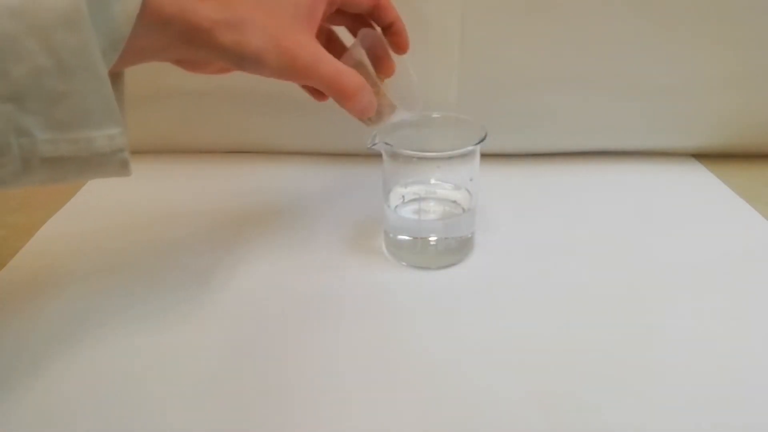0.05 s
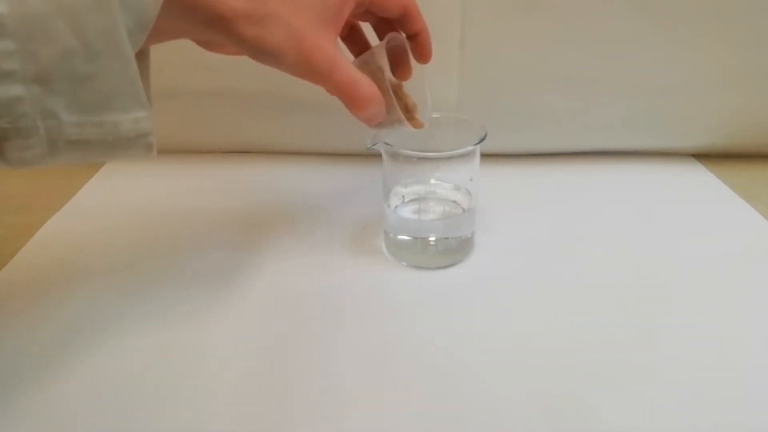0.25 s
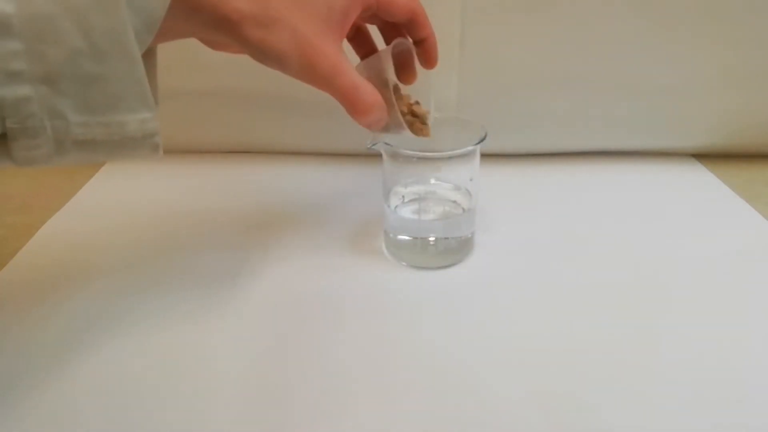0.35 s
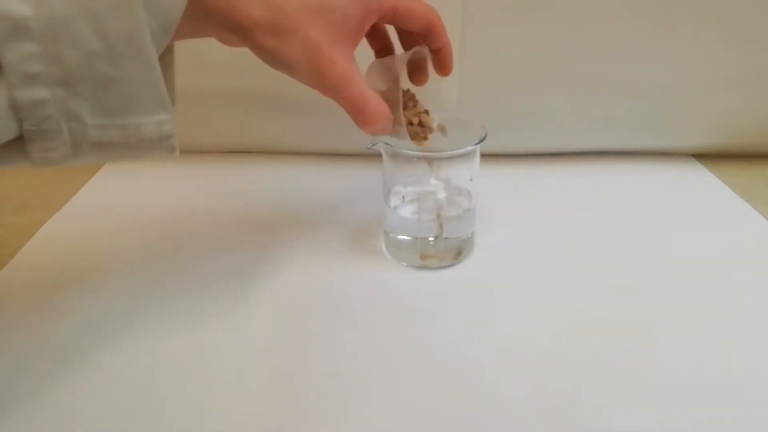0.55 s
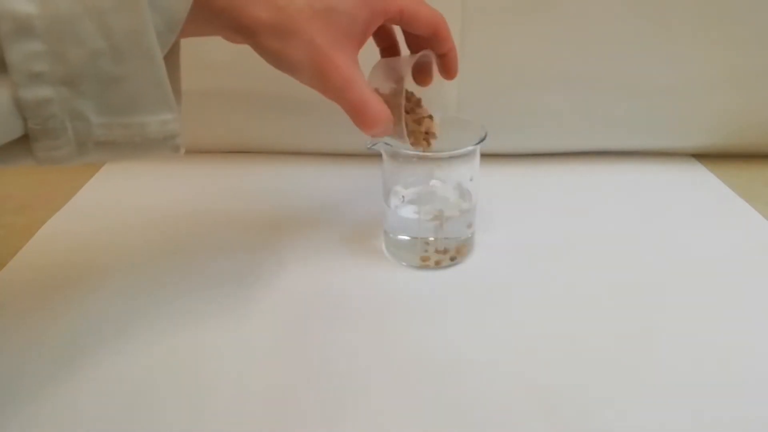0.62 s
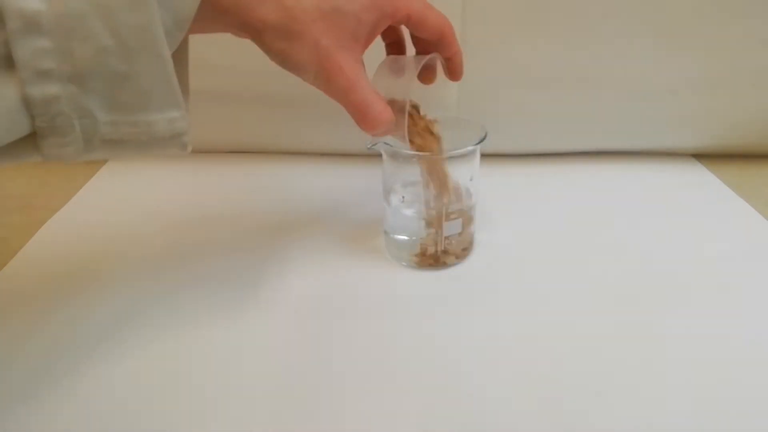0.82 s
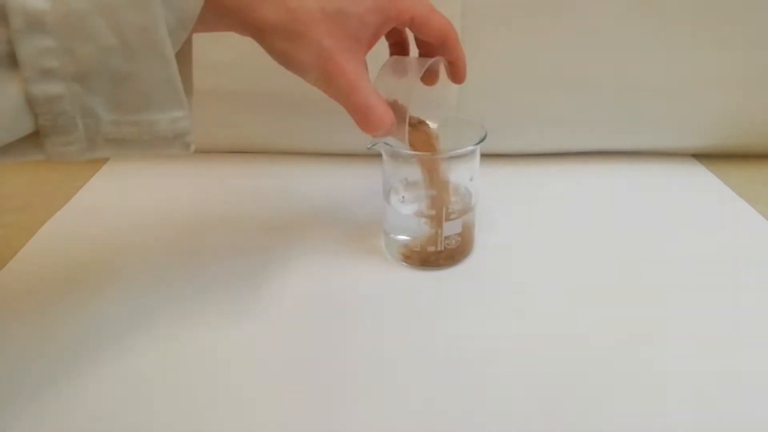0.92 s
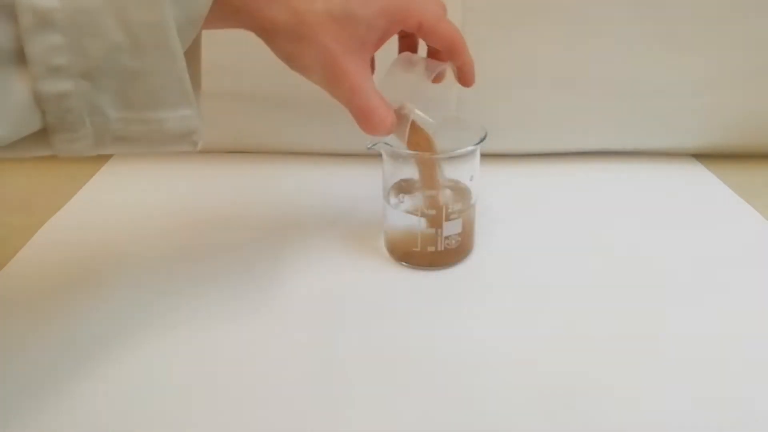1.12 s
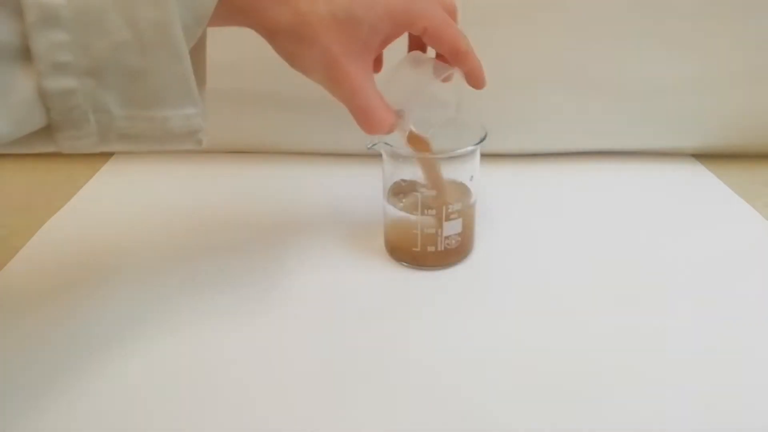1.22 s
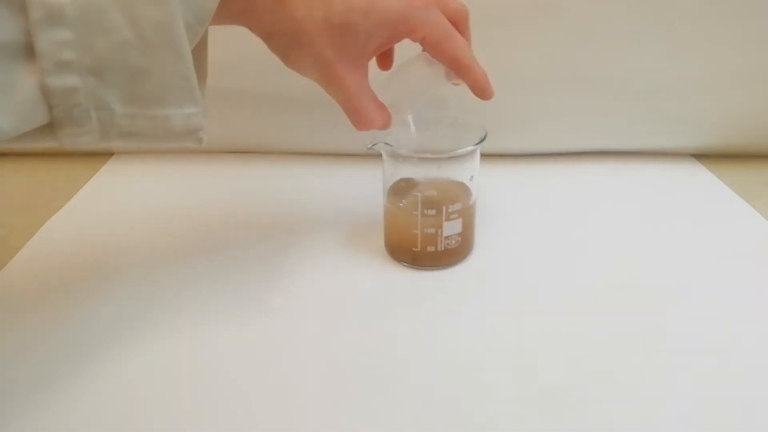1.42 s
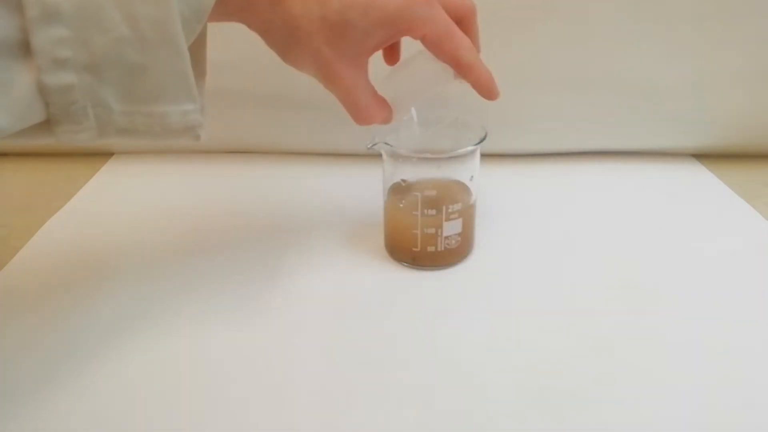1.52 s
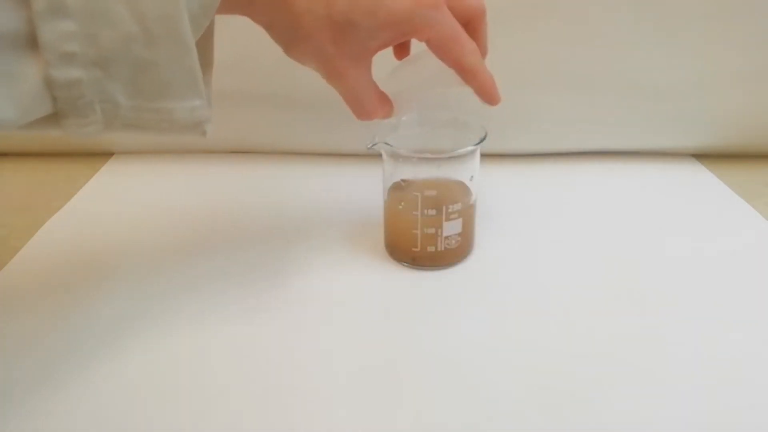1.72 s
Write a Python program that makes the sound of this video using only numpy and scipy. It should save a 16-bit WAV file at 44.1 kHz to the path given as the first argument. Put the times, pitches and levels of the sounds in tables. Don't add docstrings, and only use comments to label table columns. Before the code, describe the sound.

Coarse grains tick and rattle sharply in a small plastic dish, then slide with fine sand into a glass beaker of water, hissing, ringing the glass and plinking. Quiet humming room, close bright recorder, duller on the left.

```python
import sys
import numpy as np
from scipy import signal
from scipy.fft import rfft, irfft
from scipy.io import wavfile

SR = 44100
rng = np.random.default_rng(int(sys.argv[2]) if len(sys.argv) > 2 else 0)


def how_loud(loudness_db):
    steps = np.asarray(loudness_db, float) / 20
    return 10 ** steps


def unload_audio(sound):
    columns = np.transpose(np.atleast_2d(sound))
    steps = np.round(np.clip(columns, -1, 1) * 32767)
    wavfile.write(sys.argv[1], SR, steps.astype(np.int16))


N = 77175
TIME = np.arange(N) / SR
HZ = np.fft.rfftfreq(N, 1 / SR)
TICK_T60_S, TICK_LOW_HZ = 0.0075, 6030
TICK_DB, TICK_LATE_S = 3, 0.0006


def evened(x):
    return x / np.sqrt(np.mean(x ** 2) + 1e-20)


def read(points, hz):
    f, value = np.transpose(points)
    return np.interp(np.log(hz + 1), np.log(f + 1), value)


def add(mix, s, sound):
    part = mix[round(s * SR):][:len(sound)]
    part += sound[:len(part)]


def wander(per_s):
    knots = rng.standard_normal(round(N / SR * per_s) + 2)
    return np.interp(TIME * per_s, np.arange(len(knots)), knots)


def resonate(x, hz, width):
    turn = np.exp(2j * np.pi * hz * TIME)
    r = np.exp(-np.pi * width / SR)
    return 2 * (turn * signal.lfilter([1 - r], [1, -r], x / turn)).real


def high_pass(x, hz):
    return signal.lfilter(*signal.butter(2, hz, "high", fs=SR), x)


def room_air():
    # (frequency [Hz], level [dB])
    air_left = [(25, -2.5), (200, -6), (400, -13), (1400, -20.5), (4500, -30), (7300, -34), (10000, -28),
                (15500, -27)]
    air_right = [(25, -6.5), (200, -4.5), (400, -16.5), (1400, -24.5), (4500, -29.5), (9500, -50),
                 (13000, -15), (15500, -17)]
    # (frequency [Hz], likeness [0..1])
    likeness = [(60, 0.84), (270, 0.65), (640, 0.41), (1400, 0), (6800, 0.25), (10000, 0.12)]
    # (frequency [Hz], width [Hz], level [dB])
    hum = [(198.7, 8.9, -70.5), (101.2, 9.5, -79), (48.4, 37, -83)]
    # (time [s], level [dB], frequency [Hz], length [s])
    thumps = [
        (0.039, -58.5, 87, 0.061),
        (.04, -57.5, 264, 0.019),
        (0.731, -54.5, 680, 0.0069),
        (0.948, -57, 82, 0.23),
    ]

    a, b, c = rng.standard_normal((3, N))
    same = np.clip(read(likeness, HZ), 0, 1)
    spectra = np.array([rfft(a), same * rfft(a) + np.sqrt(1 - same ** 2) * rfft(b)])
    colour = how_loud(np.array([read(air_left, HZ), read(air_right, HZ)]))
    air = how_loud(-62) * evened(irfft(spectra * colour, N))
    low = sum(how_loud(db) * evened(resonate(c, hz, width)) for hz, width, db in hum)
    for s, db, hz, length in thumps:
        t = np.arange(0, length, 1 / SR)
        add(low, s, how_loud(db) * np.sin(np.pi * t / length) * np.sin(2 * np.pi * hz * t))
    return air + low


def knocks():
    # (time [s], peak [dB], decay t60 [s])
    blows = [(0.0394, -33.5, 0.031), (0.2094, -48.5, 0.045), (.222, -39, 0.045), (.3, -49, 0.067),
             (0.331, -50, 0.062), (0.355, -48, 0.042), (0.381, -49.5, 0.14), (0.448, -47, 0.041),
             (.478, -44, 0.022), (.731, -42.5, 0.021), (1.114, -46, 0.073)]
    # (frequency [Hz], level [dB])
    modes = [(1165, 2.5), (1420, -9), (1750, -0.5), (1960, -1), (2250, -22)]

    out, t = np.zeros(N), TIME[:5000]
    band = signal.butter(3, [800, 2200], "band", fs=SR, output="sos")
    for s, db, t60 in blows:
        decay = how_loud(-60 * t / t60)
        ring = 0
        for hz, mode_db in modes:
            odd = rng.standard_normal()
            ring = ring + how_loud(mode_db + 2 * odd) * decay * np.sin(2 * np.pi * hz * (1 + 0.02 * odd) * t)
        puff = signal.sosfilt(band, rng.standard_normal(len(t))) * decay
        add(out, s, how_loud(db - 0.5) * (ring / abs(ring).max() + 0.8 * puff / abs(puff).max()))
    return out


def plinks():
    # (time [s], peak [dB], pitch [Hz], decay t60 [s])
    bubbles = [(.275, -41.5, 1953, 0.037), (.558, -40, 14000, 0.044), (.57, -40, 15250, 0.064),
               (.574, -47, 1685, 0.027), (0.6, -36, 13100, .05), (.603, -36, 13500, .07),
               (.604, -49, 10100, .04), (.628, -42, 14000, .05), (0.68, -32.5, 10000, .04),
               (0.608, -46.5, 1360, 0.078), (0.77, -46.5, 1790, 0.031), (.81, -66.5, 467, 0.67),
               (0.8113, -38.5, 5900, 0.1), (0.813, -43.5, 3280, 0.048), (.812, -49, 1489, 0.077),
               (0.837, -48.5, 3240, 0.071), (.826, -49.5, 1355, 0.049), (0.846, -50.5, 1220, 0.037),
               (.866, -43, 1658, 0.049), (0.8673, -37.5, 5530, 0.079), (0.869, -49, 1160, 0.048),
               (0.89, -43.5, 1187, 0.13), (.962, -46.5, 3410, 0.052), (.965, -39, 5180, 0.069),
               (1.037, -51.5, 1950, 0.07), (1.051, -40, 3410, 0.018), (1.0509, -34.5, 3830, 0.042),
               (1.334, -52.5, 5330, .05)]

    out, t = np.zeros(N), TIME[:6000]
    for s, db, hz, t60 in bubbles:
        envelope = how_loud(db - 60 * t / t60) * np.minimum(t / 0.00046, 1)
        add(out, s, envelope * np.sin(2 * np.pi * hz * t))
    return out * (1 + 0.25 * wander(250))


def snaps():
    # (time [s], peak [dB], colour [Hz])
    strays = [(0.0404, -41, 9000), (0.088, -45, 14500), (.1651, -50, 13000), (0.2721, -22.5, 8900),
              (0.275, -29, 9500), (0.3182, -25, 12100), (0.3277, -40, 12500), (.3476, -44, 13000),
              (.3569, -23, 13600), (.3927, -49, 13000), (.4126, -40, 13500), (0.421, -38, 12400),
              (.4259, -38, 8950), (.4433, -32, 13000), (.4475, -28, 12600), (.4626, -41, 12000),
              (0.4586, -41, 12100), (0.515, -46, 13000), (.6085, -45, 12500), (.6417, -34, 10900),
              (0.6906, -29, 12600), (0.725, -31, 11900), (0.7456, -43, 14100), (.761, -33, 12700),
              (.7756, -32.5, 10330), (.812, -31, 12700), (0.8408, -29, 12500), (0.8875, -27, 12100),
              (0.8924, -27, 10900), (0.9305, -30, 12600), (0.945, -28, 14500), (0.9493, -25.5, 12000),
              (1.0182, -29, 7400), (1.1, -28, 12960), (1.1598, -28.5, 13500), (1.1887, -31, 14000),
              (1.206, -36, 11900), (1.2167, -36, 12500), (1.22, -42, 9800), (1.2344, -37, 13000),
              (1.2405, -37, 10230), (1.2457, -33.5, 12500), (1.2606, -34, 13500), (1.307, -28.5, 14200),
              (1.3257, -32.5, 14000), (1.333, -36, 10300), (1.3584, -36, 14300), (1.381, -48, 12800),
              (1.4049, -47, 13600), (1.4125, -41.5, 11600), (1.4354, -49, 14500), (1.4739, -45.5, 11200),
              (1.563, -49, 8000), (1.572, -45, 14700), (1.5756, -58, 13500), (1.601, -52.5, 15000),
              (1.6034, -49, 6200), (1.6262, -52, 13800)]
    t60_s, spread = 0.0044, 1.36

    out, t = np.zeros(N), TIME[:500]
    envelope = how_loud(-60 * t / t60_s) * np.minimum(t / 0.0003, 1)
    for s, db, hz in strays:
        edges_hz = [hz / spread, min(hz * spread, SR / 2.2)]
        burst = np.tanh(2 * rng.standard_normal(500)) * envelope
        x = signal.lfilter(*signal.butter(2, edges_hz, "band", fs=SR), burst)
        add(out, s + TICK_LATE_S, how_loud(db + TICK_DB) * x / abs(x).max())
    return out


def tick(t60):
    t = TIME[:900]
    burst = np.tanh(2 * rng.standard_normal(900)) * how_loud(-60 * t / t60) * np.minimum(t / 0.00034, 1)
    x = high_pass(burst, TICK_LOW_HZ)
    return x / abs(x).max()


def patter(per_s, size_db, low_hz):
    hits = (rng.random(N) < per_s / SR) * how_loud(2 * size_db * np.minimum(rng.exponential(1, N), 3))
    count = 8
    kind, out, t = rng.integers(0, count, N), np.zeros(N), TIME[:600]
    for k in range(count):
        power = how_loud(-120 * t / (TICK_T60_S * (0.5 + k / count))) * np.minimum(t / 0.0004, 1)
        strength = np.sqrt(abs(signal.oaconvolve(hits * (kind == k), power)[:N]))
        out += high_pass(rng.standard_normal(N) * strength, low_hz * (0.59 + k % 4 / 4))
    return evened(out)


def glass(strikes):
    # (frequency [Hz], width [Hz], level [dB])
    wall = [(1190, 90, -9), (1700, 200, -12), (3250, 160, -6), (5070, 90, -8), (5590, 100, -5),
            (5950, 110, -4), (6650, 150, -7), (10100, 260, -1), (11800, 400, -4), (12900, 400, -3),
            (13900, 350, -2), (15200, 300, -2)]

    out = np.zeros(N)
    for hz, width, db in wall:
        out += how_loud(db) * resonate(strikes * how_loud(5.5 * wander(100)), hz, width)
    return 3 * out


def grains():
    # (time [s], fine sand [dB], coarse grains [dB])
    flow = [(0, -54.5, -80), (.12, -64.5, -77), (0.201, -49.5, -68), (.222, -39.5, -32.5), (.27, -35, -51),
            (0.343, -47.5, -71), (0.371, -38.5, -69), (.47, -44.5, -56), (.545, -52, -72),
            (0.601, -42, -68), (.67, -47, -71), (.7, -44.5, -42), (.8, -42, -59), (.9, -44.5, -40.5),
            (1.08, -51, -44.5), (1.251, -57.5, -53), (1.4, -69.5, -61.5), (1.75, -69.5, -89)]
    # (time [s], peak [dB], length share)
    dish_ticks = [(0.015, -37.5, 0.8), (0.0192, -37, 1.5), (.0732, -44.5, 1.3), (0.1355, -31.5, 0.54),
                  (.155, -34.5, .9), (.181, -20, 0.79), (0.1877, -28.5, 0.64), (.2000, -28, 0.76),
                  (0.2086, -3, 0.86), (0.221, -20, 1.6), (0.2292, -19.5, 1.4), (0.2428, -19.5, 1.1),
                  (0.2471, -16, 1.25), (.2594, -46, 1.3), (.267, -29, 2), (.2820, -19.5, 0.4),
                  (0.3021, -20.5, 0.69), (0.3102, -20, 1.1), (0.3317, -21, .8), (0.3533, -16.5, 0.97),
                  (0.3866, -33, 0.42), (0.454, -24, 0.73), (0.478, -27, 0.47), (0.4914, -27.5, 0.48),
                  (0.503, -27, 0.94), (0.525, -27.5, 0.92)]
    # (time [s], peak [dB], share that rings the glass)
    falling = [(.557, -38, 1), (.570, -34, 0.37), (.594, -30, .2), (0.6003, -33, 0.82), (.627, -38, 0.54),
               (.652, -33, .3), (0.661, -35, .6), (0.6799, -28.5, 0.8), (0.6946, -24.5, .2),
               (.705, -27.5, 0.36), (0.8194, -25.5, 0.52), (.867, -34, 0.62), (0.876, -28.5, 0.42),
               (1.1168, -28.5, 0.13), (1.1556, -35, 0.16), (1.175, -36.5, .2)]
    glass_from_s, glass_until_s, glass_db, ping_db = 0.627, 1.34, -7, 3.5

    s, fine_db, coarse_db = np.transpose(flow)
    dry = how_loud(np.interp(TIME, s, fine_db)) * patter(per_s=5000, size_db=4.5, low_hz=2420)
    dry += how_loud(np.interp(TIME, s, coarse_db)) * patter(per_s=600, size_db=0.5, low_hz=TICK_LOW_HZ)
    fade_db = -60 * np.maximum(TIME - glass_until_s, 0)
    strikes = dry * np.clip((TIME - glass_from_s) / 0.039, 0, 1) * how_loud(glass_db + fade_db)
    for s, db, length in dish_ticks:
        add(dry, s + TICK_LATE_S, how_loud(db + TICK_DB) * tick(TICK_T60_S * length))
    for s, db, share in falling:
        hit = how_loud(db + TICK_DB) * tick(TICK_T60_S * (1 + 2 * share))
        add(dry, s + TICK_LATE_S, (1 - share / 2) * hit)
        add(strikes, s + TICK_LATE_S, share * how_loud(ping_db) * hit)
    return dry + glass(strikes)


def tail(t60):
    t = TIME[:SR]
    x = rng.standard_normal(SR) * how_loud(-60 * t / t60) * np.minimum(t / 0.0011, 1)
    return x / np.linalg.norm(x)


def ports(x, left_db, right_db, direct_share):
    # (frequency [Hz], phase [rad])
    left_phase = [(300, -.6), (1200, -1.25), (3800, -2.2), (4600, -2.8), (5900, -5.9), (7500, -6.6),
                  (15500, -13)]
    # (frequency [Hz], half width [Hz], level [dB])
    valleys = [(2400, 250, -3), (2750, 150, -7), (4200, 350, -6)]
    near_t60_s, near_db, room_t60_s, room_db = 0.023, -13.5, 0.22, -8.5
    flat = np.ones(len(HZ))

    share = direct_share / (1 + (HZ / 7760) ** 6)
    lag = np.exp(1j * read(left_phase, HZ))
    near, far = np.zeros((2, 2, N))
    for k in range(10):
        part = x * abs(np.cos(np.pi * (TIME * 6 + k / 10))) ** 8 / np.sqrt(2)
        for port in range(2):
            near[port] += signal.fftconvolve(part, tail(near_t60_s))[:N]
            far[port] += signal.fftconvolve(part, tail(room_t60_s))[:N]
    direct = rfft(x) * np.array([share * lag, flat])
    nearby = rfft(near) * np.array([np.sqrt(1 - share ** 2), how_loud(near_db) * flat])
    heard = direct + nearby + how_loud(room_db) * rfft(far)
    dips_db = sum(db * np.exp(-((HZ - hz) / width) ** 2) for hz, width, db in valleys)
    return irfft(heard * how_loud(np.array([left_db, right_db]) + dips_db), N)


def scene():
    # (frequency [Hz], level [dB])
    left_colour = [(300, 8.5), (1400, -13), (4100, -11.5), (6200, -10.5), (7600, -4.5), (8400, -9.5),
                   (10000, -19.5), (15500, -36)]
    right_colour = [(300, 1.5), (1400, -7.5), (2800, -10.5), (4500, -9), (6200, -7), (8500, -7),
                    (10200, -5.5), (15500, -5.5)]

    left_db, right_db = read(left_colour, HZ), read(right_colour, HZ)
    tone_left_db = np.clip(left_db - right_db, -25, 0) - 1
    tones = ports(plinks() + knocks(), tone_left_db, np.full(len(HZ), 3), direct_share=0.92)
    pour = ports(how_loud(7.5) * (grains() + snaps()), left_db, right_db, direct_share=0.53)
    return pour + tones + room_air()


def band_limit(x):
    return signal.sosfilt(signal.butter(12, 17060, fs=SR, output="sos"), x)


def record(dry):
    x = signal.oaconvolve(dry, signal.firwin(511, 15850, fs=SR)[None], "same")
    return band_limit(np.clip(x, -0.92, 0.92))


dry = scene()
out = record(dry)
unload_audio(out)
```